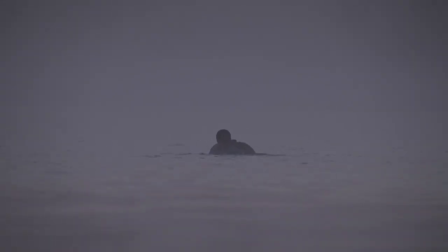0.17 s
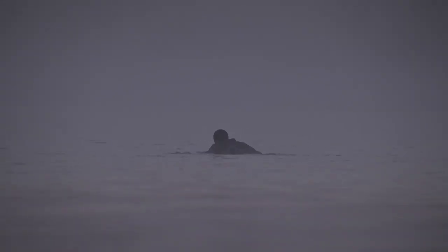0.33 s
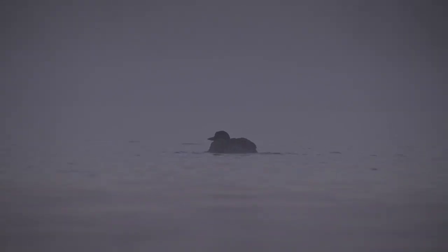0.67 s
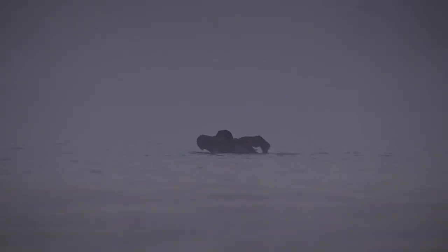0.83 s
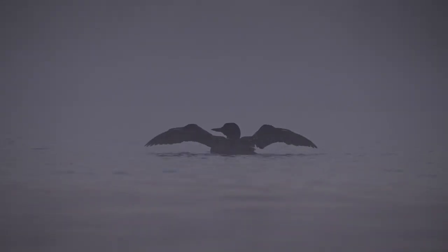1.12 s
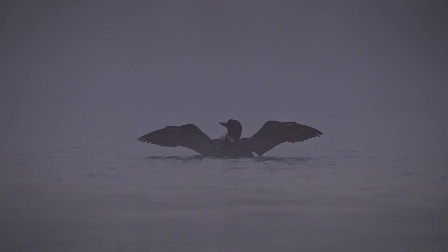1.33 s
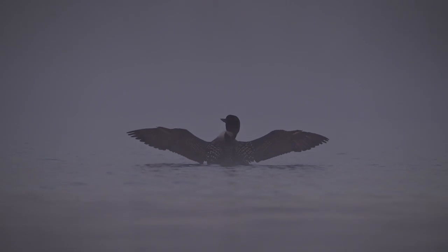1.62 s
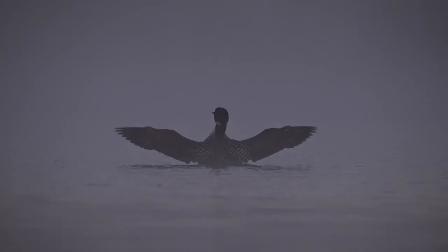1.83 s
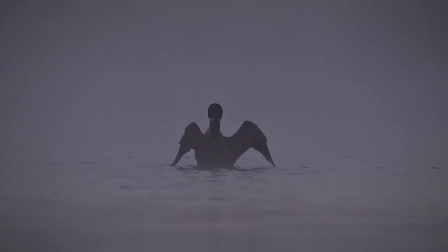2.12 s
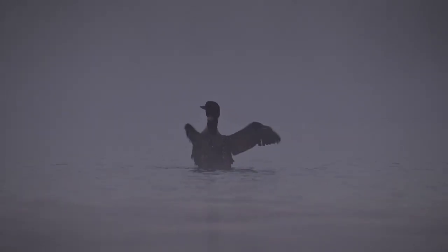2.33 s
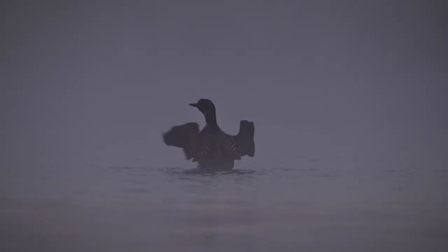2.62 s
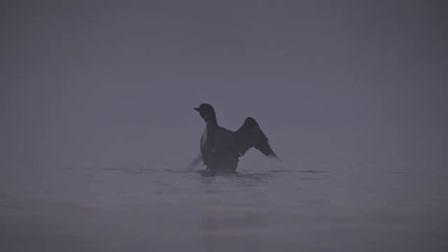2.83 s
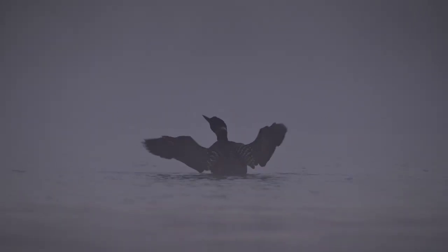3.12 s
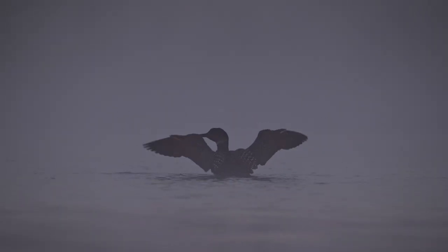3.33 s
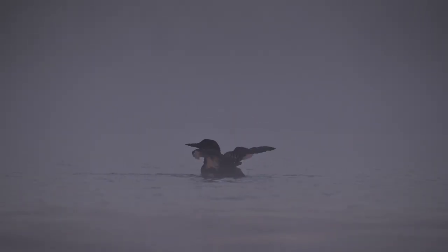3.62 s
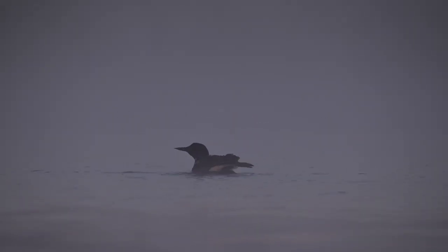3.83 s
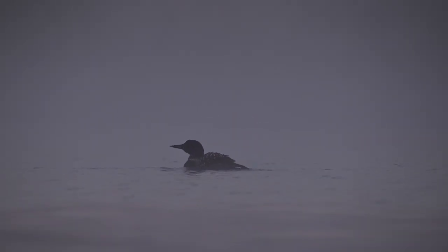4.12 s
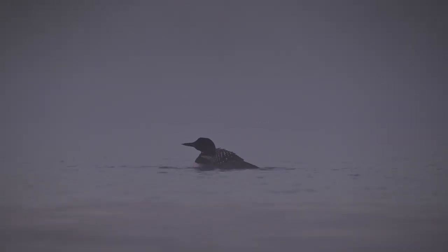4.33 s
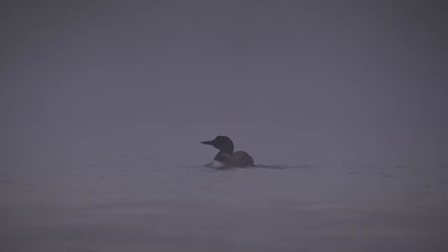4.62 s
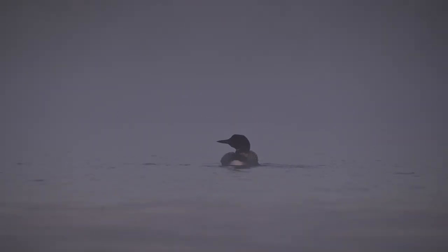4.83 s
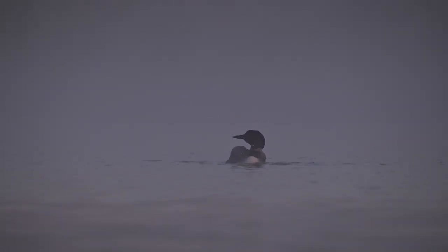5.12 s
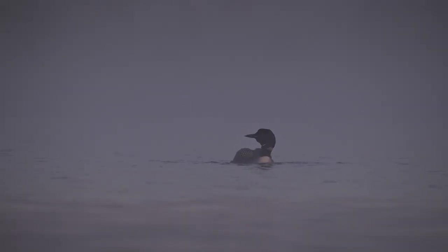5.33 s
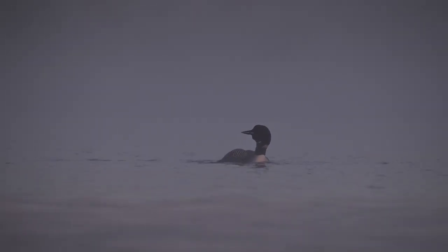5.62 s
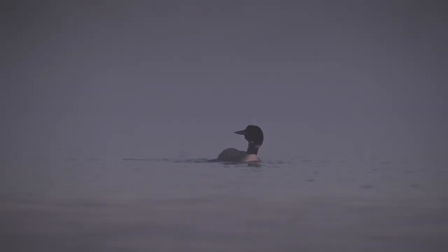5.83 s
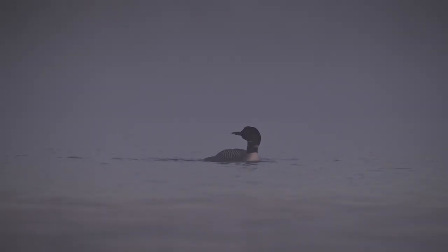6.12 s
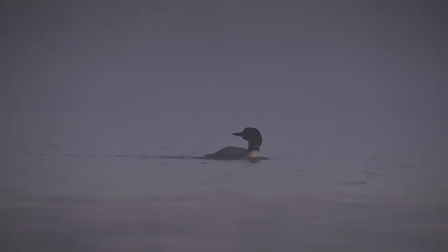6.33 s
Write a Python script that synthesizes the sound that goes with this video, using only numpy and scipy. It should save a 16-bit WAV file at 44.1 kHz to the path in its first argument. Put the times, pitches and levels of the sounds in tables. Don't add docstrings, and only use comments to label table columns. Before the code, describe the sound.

Quiet lake ambience with soft hiss and bird whistles; three wing beats, a brief wavering loon call, and finally a strong rising yodel.

```python
import sys
import numpy as np
from scipy import signal
from scipy.fft import rfft, irfft
from scipy.io import wavfile
from scipy.ndimage import uniform_filter1d

SR = 44100
rng = np.random.default_rng(int(sys.argv[2]) if len(sys.argv) > 2 else 0)


def inscribe(sig):
    pcm = np.round(np.clip(np.atleast_2d(sig).T, -1, 1) * 32767)
    wavfile.write(sys.argv[1], SR, pcm.astype(np.int16))


def gain_from_db(level_db):
    decades = np.asarray(level_db, float) / 20
    return 10 ** decades


N = 285327


def evened(x):
    return x / np.sqrt(np.mean(x ** 2) + 1e-20)


def read(points, hz):
    f, value = np.transpose(points)
    return np.interp(np.log(hz + 1), np.log(f + 1), value)


def add(mix, s, sound):
    part = mix[round(s * SR):][:len(sound)]
    part += sound[:len(part)]


def resonate(x, *modes):
    for hz, width in modes:
        r = np.exp(-np.pi * width / SR)
        x = 2 * signal.lfilter([1 - r], [1, -r * np.exp(2j * np.pi * hz / SR)], x).real
    return x


def placed(x, pan_db, order):
    return np.array([gain_from_db(pan_db / 2) * np.roll(x, order), gain_from_db(-pan_db / 2) * x])


def side_gain(db, pan_db):
    return gain_from_db(db + np.array([[.5], [-.5]]) * pan_db)


def scatter(x, delay, spread, size):
    t = np.maximum(np.arange(size) / SR - delay, 0) / spread
    sparse = rng.random((2, size)) < .05
    taps = rng.standard_normal((2, size)) * sparse * np.sqrt(t) * np.exp(-t)
    taps[1] = 0.59 * taps[0] + 0.88 * taps[1]
    return signal.fftconvolve(x[None], taps / np.linalg.norm(taps[0]), axes=1)[:, :N]


def swells(rows, rise_db_s, fall_db_s):
    t = np.arange(N) / SR
    s, hold, db = np.transpose(rows)[:, :, None]
    rise = rise_db_s * np.maximum(s - t, 0)
    fall = fall_db_s * np.maximum(t - s - hold, 0)
    return (db - rise - fall).max(0)


def air():
    # frequency in Hz, level in dB per Hz.
    wash = [(15, -29), (25, 2.5), (110, 1), (199, -2.5), (458, -2), (650, -5), (875, -1.5), (1090, -7),
            (1910, -18), (3270, -15.5), (4900, -24), (7960, -29), (10400, -25), (12500, -33.5),
            (14000, -34.5), (15600, -38.5)]
    # frequency in Hz, correlation from -1 to 1.
    likeness = [(60, 0.99), (120, 0.99), (240, 0.99), (480, 0.93), (950, 0.72), (1890, -0.23),
                (3770, -0.061), (7520, -0.048), (15000, -0.02)]
    # frequency in Hz, left over right in dB.
    tilt = [(180, 0), (550, -1), (1650, 0.5), (4970, 0.5), (15000, 0.5)]
    frames, hz = N // 256 + 5, np.fft.rfftfreq(1024, 1 / SR)
    a, b, c, d, patches = rng.standard_normal((frames, 513, 5)).T
    patches = uniform_filter1d(patches, size=10, axis=0)
    patches = evened(uniform_filter1d(patches, size=12, axis=1))
    same = np.clip(read(likeness, hz), -.9, 1)[:, None]
    left, other = a + 1j * b, c + 1j * d
    z = np.array([left, same * left + np.sqrt(1 - same ** 2) * other]) / np.sqrt(1 + same)
    lean_db = read(tilt, hz)[:, None] / 2
    z *= gain_from_db(read(wash, hz)[:, None] + 1.6 * patches + np.array([lean_db, -lean_db]))
    hiss = signal.istft(z, nperseg=1024, noverlap=768)[1][:, :N]
    return gain_from_db(-55.5) * evened(hiss)


def breeze():
    # start in seconds, hold in seconds, level in dB.
    gusts = [
        (0.0, 0.0076, -47),
        (.79, .02, -54.5),
        (.92, 0.0078, -49.5),
        (2.65, 0.67, -61),
        (4.02, .01, -61),
        (5.26, .6, -71),
    ]
    calm_db = -80
    lumps = evened(resonate(rng.standard_normal(N), (36, 30), (36, 30)))
    return gain_from_db(np.maximum(swells(gusts, rise_db_s=122, fall_db_s=157), calm_db)) * lumps


def slur(u, sweep_hz):
    return sweep_hz * (1 - (1 - u) ** 1.15)


def arch(u, sweep_hz):
    round_hz = 1200
    return sweep_hz * (1 - abs(2 * u - 1) ** np.clip(round_hz / abs(sweep_hz + 1e-9), 1, 2))


def birds(rows, shape, lift_db, pan_db, wet_db, order):
    thin_hz, thin_db_per_khz = 3950, -14
    song = np.zeros(N)
    for s, length, from_hz, to_hz, db in rows:
        u = np.arange(0, length, 1 / SR) / length
        glide = from_hz + shape(u, to_hz - from_hz)
        thin_db = thin_db_per_khz * np.maximum(glide - thin_hz, 0) / 1000
        whistle = signal.windows.tukey(len(u), .4) * np.sin(2 * np.pi * np.cumsum(glide) / SR)
        add(song, s, gain_from_db(db + lift_db - 0.5 + thin_db) * whistle)
    song *= gain_from_db(1.8 * evened(uniform_filter1d(rng.standard_normal(N), size=400)))
    trees = scatter(song, 0.0024, 0.0023, size=SR // 2)
    trees += gain_from_db(-8.0) * scatter(song, 0.01, 0.045, size=SR // 2)
    trees += gain_from_db(-2.5) * np.roll(trees, 620, axis=1)
    trees *= gain_from_db([[pan_db / 3], [-pan_db / 3]])
    trees[0] *= -1
    return placed(song, pan_db, order) + gain_from_db(wet_db) * trees


def far_chorus(count):
    s, length, mid, slope, db = rng.random((count, 5)).T
    hz, rise = 2500 + 1300 * mid, 1700 * (slope - .5)
    return np.transpose([N / SR * s, .03 + .04 * length, hz - rise, hz + rise, -76 + 11 * db ** 2])


def woods():
    # start in seconds, length in seconds, from Hz, to Hz, level in dB.
    cries = [(s + late, .2, 2800, 1750, -82) for s in (1.33, 4.85) for late in (0, .025, .055, .09)]
    slurs_faint = [(1.02, .025, 3740, 4120, -66), (1.045, .04, 3180, 2830, -71),
                   (1.225, .02, 3900, 3600, -60), (1.3, .045, 3170, 3160, -60),
                   (1.49, 0.027, 3700, 4080, -66), (1.53, 0.038, 2490, 3150, -64),
                   (1.76, 0.061, 3700, 2570, -64), (1.8, .035, 3300, 3090, -64),
                   (1.9, 0.038, 3600, 3420, -65.5), (1.95, .018, 4070, 3500, -65),
                   (2.135, 0.025, 4050, 3180, -76), (2.255, 0.033, 3540, 3000, -59),
                   (2.415, 0.017, 3500, 4000, -71), (2.51, 0.029, 3650, 3950, -64),
                   (2.595, 0.073, 3480, 2640, -64), (2.65, .055, 2970, 3580, -62),
                   (2.7, 0.053, 3300, 3000, -71), (3.432, 0.025, 3540, 4570, -57),
                   (3.46, 0.024, 4290, 3140, -65), (3.53, 0.023, 2930, 3680, -57.5),
                   (3.665, .05, 5380, 4630, -62), (3.778, 0.017, 3780, 3330, -70),
                   (3.87, 0.054, 3150, 3910, -65), (4.055, .045, 2300, 2560, -75),
                   (4.1, .06, 3680, 2263, -70), (4.19, 0.023, 3695, 2794, -67),
                   (4.24, .06, 4377, 3300, -63), (4.26, .03, 2700, 3400, -65)]
    slurs_across = [(.37, 0.045, 3150, 2720, -79), (.45, 0.023, 3300, 2500, -70),
                    (.585, .06, 3050, 4140, -63), (.32, .025, 4250, 4430, -60), (.02, .05, 2680, 2600, -66),
                    (.12, .04, 3700, 3500, -69), (.52, 0.042, 3000, 2500, -65),
                    (.785, .04, 3700, 3020, -70), (.84, 0.052, 2850, 2660, -62.5),
                    (1.09, 0.026, 3580, 4460, -59.5), (1.132, .02, 4480, 3960, -56.5),
                    (1.53, .05, 2950, 4600, -54.5), (1.578, .035, 4500, 2950, -55),
                    (1.705, .05, 2940, 4580, -54), (1.753, .025, 4600, 3660, -58),
                    (.15, .04, 2800, 2530, -76), (.2, .035, 3000, 3300, -77), (.24, .035, 2950, 2580, -73),
                    (.29, .04, 2900, 2490, -80), (.305, .035, 3200, 3700, -71),
                    (1.36, .05, 2750, 2440, -67), (3.83, .045, 3050, 2650, -72),
                    (5.85, .04, 3500, 3240, -64.5), (4.38, .04, 3100, 3180, -68),
                    (2.783, 0.018, 3480, 3040, -56), (2.835, 0.032, 3630, 2910, -65),
                    (3.105, 0.046, 3550, 2200, -63), (3.16, 0.11, 2280, 3020, -68),
                    (4.522, .025, 3120, 3700, -57), (5.035, 0.059, 3500, 4650, -60.5),
                    (5.098, 0.014, 4420, 3480, -62.5), (5.118, .025, 3500, 2760, -62),
                    (5.142, 0.017, 3210, 4350, -63.5), (5.165, 0.024, 4230, 4700, -53),
                    (5.18, .035, 2750, 3650, -57), (5.21, 0.019, 3645, 3444, -56.5),
                    (5.235, 0.059, 3400, 2600, -64), (5.89, .02, 2310, 3030, -65.5),
                    (6.11, 0.028, 2650, 3220, -60), (6.25, 0.039, 3780, 3110, -64),
                    (6.36, .03, 4240, 3390, -57.5), (6.385, 0.094, 3600, 2800, -66)]
    slurs_behind = [(.078, 0.068, 2410, 2730, -62), (1.11, 0.084, 3120, 2710, -63),
                    (1.745, 0.064, 2200, 2930, -66), (2.095, 0.045, 3150, 2650, -62),
                    (2.169, 0.053, 4050, 4760, -59), (2.271, .038, 3950, 4630, -58),
                    (2.36, 0.069, 2640, 3300, -64), (2.385, 0.03, 3900, 4750, -63),
                    (2.5, 0.036, 3140, 2820, -59), (2.74, 0.07, 2350, 3500, -60),
                    (3.3, 0.13, 2620, 2630, -70), (3.84, 0.048, 3030, 2350, -60),
                    (3.969, 0.043, 2950, 2550, -58), (4.86, 0.079, 2840, 2600, -59),
                    (5.53, 0.054, 3100, 2274, -60), (5.755, 0.049, 3400, 3220, -56),
                    (5.87, .04, 2330, 2944, -65.5), (5.94, 0.074, 2950, 2530, -56.5)]
    slurs_right = [(.47, 0.025, 3750, 3050, -61), (.565, 0.079, 2950, 4500, -58),
                   (1.176, 0.035, 3900, 2750, -61), (1.254, 0.027, 2900, 3900, -61),
                   (1.275, 0.041, 3900, 3950, -56), (1.67, 0.062, 2800, 3800, -63),
                   (2.185, 0.043, 2750, 3900, -62), (2.225, 0.042, 3900, 3200, -61.5),
                   (2.538, 0.05, 3650, 3150, -62.5), (2.915, .065, 3720, 3680, -67),
                   (3.245, 0.052, 2950, 4480, -60), (3.32, 0.031, 4450, 3800, -58.5),
                   (3.4, 0.046, 3600, 2400, -65), (3.51, .05, 4300, 3100, -65),
                   (4.055, 0.041, 3700, 2500, -62.5), (4.35, 0.022, 3390, 2600, -62),
                   (4.562, .035, 3700, 2980, -65.5), (4.62, 0.034, 3530, 4150, -67),
                   (4.96, 0.023, 3750, 3000, -63.5), (5.32, 0.057, 3200, 4000, -60.5),
                   (6.085, 0.063, 4350, 2890, -65.5), (6.155, 0.057, 3200, 4150, -63.5),
                   (6.304, 0.03, 3490, 2800, -58.5), (6.36, 0.092, 3750, 2400, -66)]
    slurs_ahead = [(.003, 0.091, 4630, 3750, -66), (.63, 0.092, 3400, 2800, -72),
                   (.812, 0.063, 2580, 3790, -61.5), (.9, 0.095, 3160, 3210, -63),
                   (.97, 0.044, 3800, 2440, -62.5), (1.944, 0.04, 3250, 2300, -64),
                   (2.003, 0.034, 3900, 2650, -61), (2.037, 0.049, 2510, 3290, -64),
                   (2.343, 0.033, 4170, 3010, -60), (2.722, 0.085, 3640, 3400, -60),
                   (2.925, 0.11, 3110, 2890, -67), (3.075, 0.044, 4050, 3450, -63),
                   (3.95, 0.037, 4150, 3030, -59.5), (3.985, 0.033, 3150, 3030, -58.5),
                   (4.12, 0.04, 2410, 4110, -58), (4.191, 0.023, 2830, 2560, -61.5),
                   (4.27, 0.06, 4070, 2620, -66), (4.405, 0.044, 4450, 3700, -62),
                   (5.56, 0.031, 4270, 3170, -57), (5.583, .02, 3100, 4110, -62.5),
                   (5.055, .02, 5040, 4384, -60), (5.37, .022, 2720, 2330, -65),
                   (4.78, .03, 3430, 2850, -71), (1.013, .022, 2500, 2950, -67),
                   (1.105, 0.023, 3300, 2930, -68), (2.075, 0.065, 3190, 2650, -64),
                   (5.6, 0.055, 4170, 2600, -56.5), (5.71, 0.067, 5090, 2810, -63.5)]
    # start in seconds, length in seconds, Hz at both ends, Hz at the turn, level in dB.
    arches = [(.355, 0.094, 3700, 4220, -60), (.73, 0.068, 3170, 3590, -67),
              (1.415, 0.078, 2820, 3610, -69), (5.092, .03, 3430, 3750, -65),
              (5.92, 0.064, 2544, 2990, -66), (1.885, 0.038, 4380, 4650, -68),
              (2.455, 0.023, 2820, 2500, -82), (2.735, 0.081, 2780, 2380, -75),
              (2.77, 0.085, 2930, 3790, -66), (2.87, 0.05, 2880, 2160, -71),
              (3.39, 0.045, 3790, 3524, -58.5), (4.155, 0.025, 3980, 3530, -55.5),
              (3.445, 0.033, 2710, 4180, -59), (3.525, 0.13, 2930, 3640, -64.5),
              (4.345, .04, 3300, 3850, -66), (4.45, 0.06, 2900, 3470, -61), (4.49, 0.033, 3900, 4370, -64),
              (4.5, 0.061, 3473, 3160, -61.5), (.066, .045, 2900, 3140, -60)]
    out = birds(far_chorus(count=320), slur, 0.092, -12.0, -2.5, order=5)
    out += birds(far_chorus(count=100), arch, 0.092, -7.5, -3.5, order=6)
    out += birds(cries, slur, 0.1, -3, 14, order=6)
    out += birds(slurs_faint, slur, 1.1, -9.5, -2.5, order=3)
    out += birds(slurs_across, slur, .5, -10.5, -4.0, order=3)
    out += birds(slurs_behind, slur, 0.98, -0.62, -6.0, order=7)
    out += birds(slurs_right, slur, 2.1, -17.0, -0.16, order=5)
    out += birds(slurs_ahead, slur, 1.8, -6, -6.5, order=2)
    return out + birds(arches, arch, 1.8, -18.0, -6.0, order=5)


def wings():
    # start in seconds, peak in dB, thump in Hz, length in seconds.
    beats = [
        (2.475, -44.5, 310, 0.016),
        (2.67, -43.5, 431, 0.0095),
        (2.852, -36.5, 401, 0.0088),
    ]
    out = np.zeros(N)
    for s, db, hz, length in beats:
        t = np.arange(0, 2 * length, 1 / SR)
        gust = rng.standard_normal(4000)
        spray = resonate(gust, (1160, 670), (1050, 820))
        puff = evened(resonate(gust, (310, 590), (310, 590)) + 0.4 * spray)
        thump = np.sin(2 * np.pi * hz * t) + .75 * puff[1000:][:len(t)]
        add(out, s, gain_from_db(db - 5.5) * thump * np.sin(np.pi * (t / length / 2) ** 1.1) ** .6)
    return out


def creaks():
    # start in seconds, length in seconds, level in dB, left over right in dB.
    scrapes = [(0.18, .006, -65.5, 12), (1.961, .01, -61, -8), (2.251, .006, -66, 10.5),
               (2.321, 0.0039, -58.5, 6.5), (2.572, .005, -59, 5), (3.092, .006, -62.5, -14.5),
               (3.301, .005, -65, 6), (3.573, .008, -64, 7), (3.649, 0.0034, -59, 19.5),
               (3.946, 0.0063, -68, 17), (4.693, 0.014, -61.5, 9), (4.731, 0.003, -64, 8),
               (4.742, .004, -65, 3.5), (5.032, 0.0033, -55.5, 10), (5.044, 0.017, -59, -5),
               (5.116, .004, -62, 9), (5.133, .011, -56.5, 7), (5.294, .02, -65, 8)]
    out, t = np.zeros((2, N)), np.arange(1500) / SR
    for s, length, db, pan_db in scrapes:
        grit = rng.standard_normal((2, 1500))
        scrape = evened(resonate(grit, (10200, 1800), (10200, 2500)) + .09 * np.diff(grit, prepend=0))
        shape = np.minimum(t / .0007, 1) * np.exp(-(t / length) ** 2)
        add(out.T, s, (side_gain(db, pan_db) * shape * scrape).T)
    return out


def ticks():
    # start in seconds, peak in dB, left over right in dB, bounce in dB.
    knocks = [
        (0.1071, -38.5, 1.5, -11),
        (0.1153, -39, 3, -26),
        (0.69, -36, 3, -20),
        (0.697, -50.5, 18.5, -29),
        (2.9917, -35.5, 1, -14),
        (3.0235, -38.5, 6.5, -45),
    ]
    # frequency in Hz, width in Hz, level in dB.
    shell = [(3300, 4200, -5.5), (4630, 130, -5.5), (5600, 1200, -9.5), (7410, 110, -5.5), (7950, 410, 4),
             (8760, 190, -3.5), (10340, 780, 1), (12670, 1500, -8)]
    out, t = np.zeros((2, N)), np.arange(900) / SR
    shake = t / .0004 * np.exp(-t / .0004)
    shake += gain_from_db(-19.5) * np.minimum(t / 0.00038, 1) * np.exp(-t / .003)
    bounce = (t > .006) * np.exp(-abs(t - .006) / .0005)
    for s, db, pan_db, bounce_db in knocks:
        a, b = rng.standard_normal((2, 900))
        knock = np.array([a, 0.14 * a + 0.67 * b]) * (shake + gain_from_db(bounce_db) * bounce)
        ring = np.zeros((2, 900))
        for hz, width, mode_db in shell:
            ring += gain_from_db(mode_db) * evened(resonate(knock, (hz, width), (hz, 2500), (hz, 3500)))
        add(out.T, s, (side_gain(db + 7.5, pan_db) * ring / abs(ring).max()).T)
    return out


def old_echo():
    # start in seconds, hold in seconds, upper partial in dB.
    returns = [
        (0.0, 0.12, -67),
        (0.47, 0.45, -59.5),
    ]
    a, b = rng.standard_normal((2, N))
    upper = resonate(a, (1760, 150), (1765, 150), (1770, 170))
    upper = evened(upper + 0.84 * resonate(a, (1080, 430), (1470, 440), (1610, 400)))
    lower = evened(resonate(b, (875, 90), (864, 90)))
    level = gain_from_db(swells(returns, rise_db_s=118, fall_db_s=116))
    return placed(level * (upper + gain_from_db(-9.0) * lower), 3.9, order=4)


def far_shore(voice, overtone):
    # delay in seconds, spread in seconds, level in dB.
    shores = [
        (.53, 0.057, -26),
        (0.699, 0.048, -28),
        (.95, .2, -29.5),
    ]
    cliff_s, hollow_hz, width_hz = .527, 1036, 14
    octave = resonate(voice, (2 * hollow_hz, 2 * width_hz), (2 * hollow_hz, 10 * width_hz))
    hollow = resonate(voice, (hollow_hz, width_hz)) + gain_from_db(12) * octave
    out = gain_from_db(-35) * scatter(voice - overtone, cliff_s, .012, size=SR)
    add(out.T, cliff_s, gain_from_db(-27) * placed(hollow, 2, order=2).T)
    for delay, spread, db in shores:
        out += gain_from_db(db) * scatter(voice + gain_from_db(-3.0) * overtone, delay - .03, spread, size=2 * SR)
    return out


def note(rows):
    # frequency in Hz, level in dB.
    windpipe = [(350, -3.5), (600, -4.5), (850, -0.7), (1080, -6), (1300, -13.5), (1600, -15), (2070, -43),
                (2450, -52.5), (3150, -34), (4100, -62), (5500, -68.5), (8200, -55.5), (10500, -64.5)]
    s, *columns = np.transpose(rows)
    t = np.arange(s[0], s[-1] + .04, 1 / SR)
    db, hz, lift_db, top_db = (uniform_filter1d(np.interp(t, s, c), size=500, mode="nearest")
                               for c in columns)
    waver = evened(uniform_filter1d(rng.standard_normal(N), size=200))[:len(t)]
    hz = hz * (1 + 0.0014 * waver)
    k = np.arange(1, 14)[:, None]
    share = gain_from_db(read(windpipe, k * hz) + lift_db * (k == 2) + top_db * (k > 2)) * (k * hz < 11000)
    share /= np.sqrt((share ** 2).sum(0) / 2)
    ring = np.exp(-np.maximum(t - s[-1], 0) * k / 0.0048)
    tone = (share * ring * np.sin(2 * np.pi * k * np.cumsum(hz) / SR)).sum(0)
    onset = np.sin(np.pi / 2 * np.clip((t - s[0]) / 0.0059, 0, 1)) ** 2
    return s[0], gain_from_db(db) * tone * onset


def loon():
    # time in seconds, level in dB, pitch in Hz,
    # second partial lift in dB, higher partials lift in dB.
    low_notes = [
        [(3.27, -66, 511, 12, 2), (3.31, -53, 506, -4, -6), (3.355, -59, 430, -6, -15)],
        [(3.357, -55, 420, -7, -10), (3.40, -58.5, 403, 2, -4), (3.455, -62, 380, 1, -7)],
        [(3.656, -54, 378, 7, -2), (3.68, -48, 406, 0, 6), (3.70, -50, 429, -2, -14),
         (3.742, -52.5, 420, -1, -11), (3.755, -47, 433, -2.5, -6), (3.772, -43.5, 491, -1, 17),
         (3.78, -43.5, 570, 14, 5), (3.787, -51, 740, -5, -7.5)],
        [(5.447, -48.5, 372.4, 10.5, 4), (5.475, -40, 445, 6, 0.5), (5.503, -34, 512, 13, -4),
         (5.525, -39, 563.5, 3, 8), (5.536, -42, 613, -2.5, 11), (5.544, -37, 735, -14, -3.5)],
        [(6.172, -45, 516, 4, -8), (6.19, -45, 483, 6, -3), (6.212, -56, 398, 1, 5)],
    ]
    high_notes = [
        [(5.543, -26, 767, -9, -7.5), (5.56, -28, 773, -7.5, -3.5), (5.62, -25.5, 788.5, -9, -10.5),
         (5.72, -24, 810.3, -4.5, -2), (5.794, -22.5, 841.4, 0.5, 9), (5.826, -23, 870, 2, 3)],
        [(5.827, -23.5, 1024, 1.5, -0.5), (5.89, -22.5, 1038, 2.5, -4.5), (5.96, -22.5, 1037, 2, -5.5),
         (5.985, -23.5, 1020, 1.5, -0.5), (6.02, -24, 1000, -13, -3), (6.058, -30, 961, -22, -20)],
        [(6.058, -28, 784, -7, -4.5), (6.10, -31, 734, -7, -6), (6.143, -36.5, 702, -12, -6),
         (6.168, -44, 681, -13, -12)],
    ]
    # time in seconds, level in dB, pitch in Hz.
    turns = [
        (3.786, -32, 850),
        (3.83, -34, 727),
        (3.862, -39, 718),
        (3.882, -33, 862),
        (3.903, -30.5, 877),
        (3.929, -30.5, 760),
        (3.952, -35, 731.4),
        (4.014, -33.5, 785),
        (4.043, -43, 700),
    ]
    tremolo = []
    for s, db, hz in turns:
        lift_db = max(0.21 * (hz - 785), -7.5)
        tremolo.append((s, db, hz, lift_db, 0.69 * lift_db - 5.5))
    voice = np.zeros(N)
    for rows in low_notes + high_notes + [tremolo]:
        add(voice, *note(rows))
    overtone = resonate(voice, (1650, 700), (1650, 700))
    out = placed(voice - overtone, 1.3, order=2) + placed(overtone, 7, order=5)
    out += gain_from_db(-22.5) * scatter(voice, 0.0024, 0.015, size=SR // 4)
    return out + far_shore(voice, overtone)


def scene():
    return air() + breeze() + woods() + wings() + creaks() + ticks() + old_echo() + loon()


def low_pass(x):
    return signal.sosfilt(signal.butter(12, 15760, fs=SR, output="sos"), x)


def record(dry):
    edge_hz = 15730
    limited = irfft(rfft(dry) * (np.fft.rfftfreq(N, 1 / SR) < edge_hz), N)
    return low_pass(limited)


dry = scene()
out = record(dry)
inscribe(out)
```